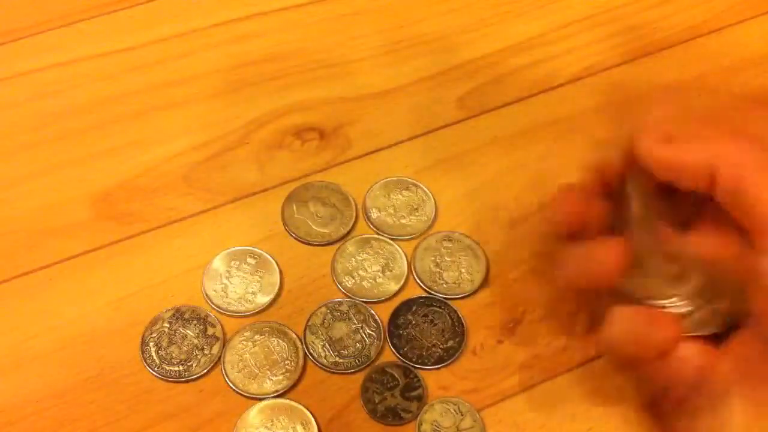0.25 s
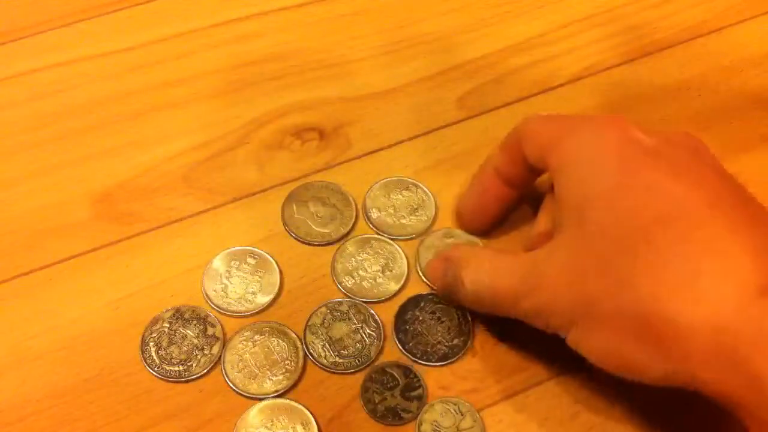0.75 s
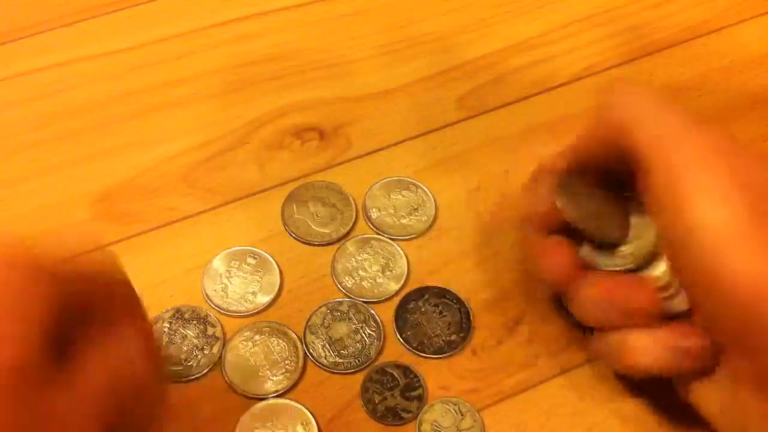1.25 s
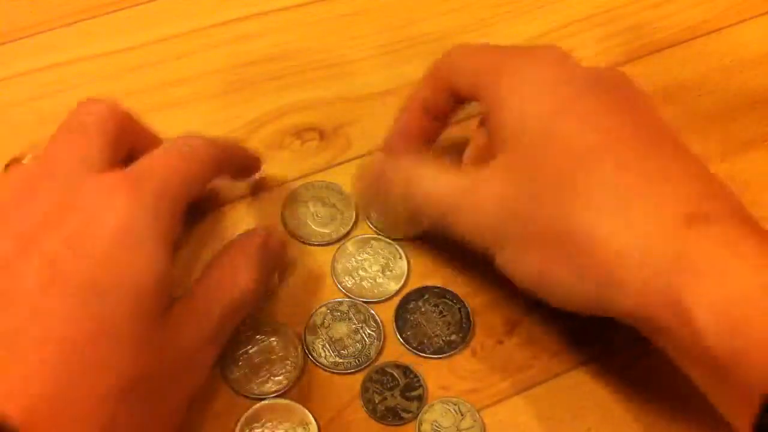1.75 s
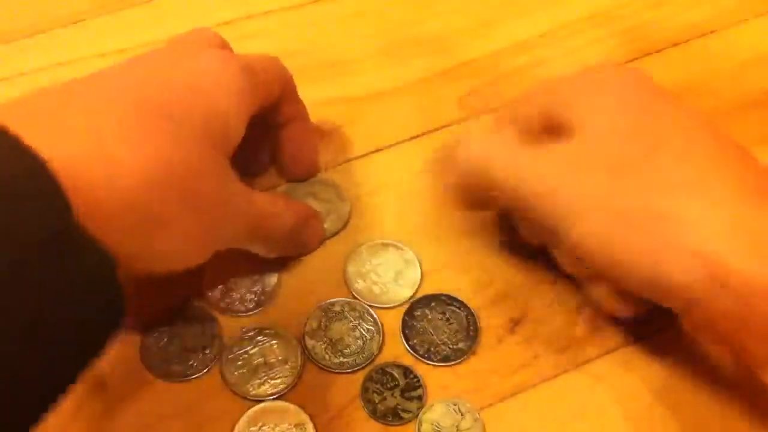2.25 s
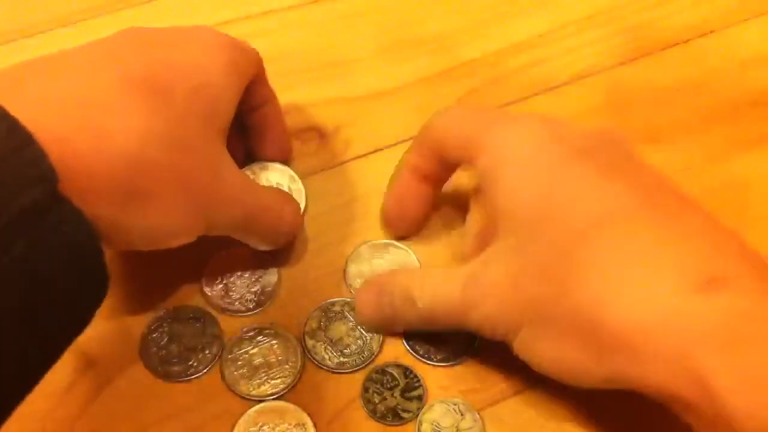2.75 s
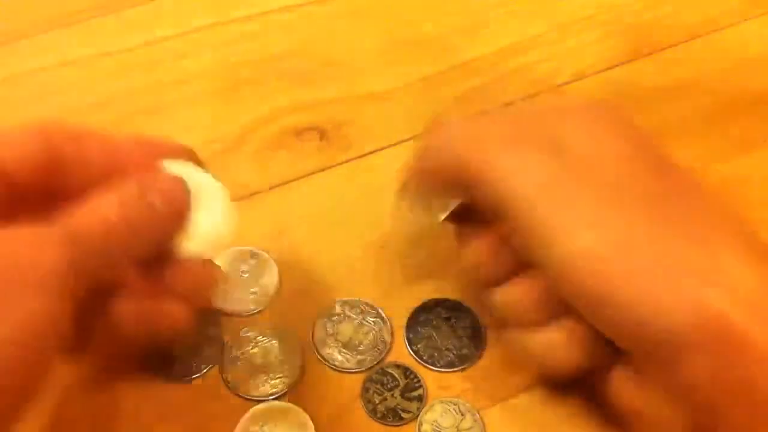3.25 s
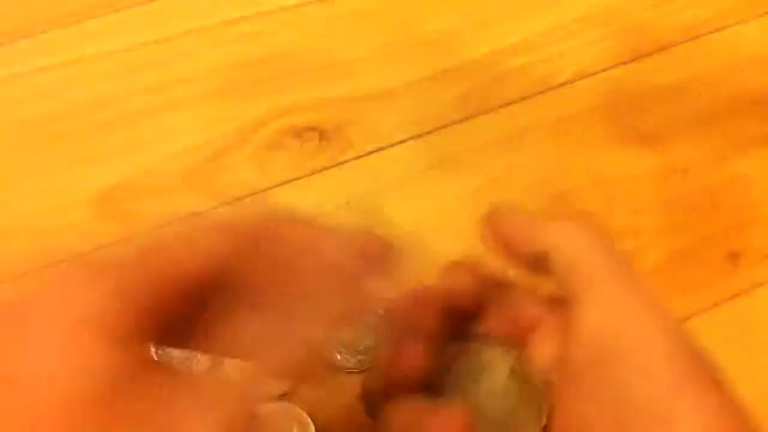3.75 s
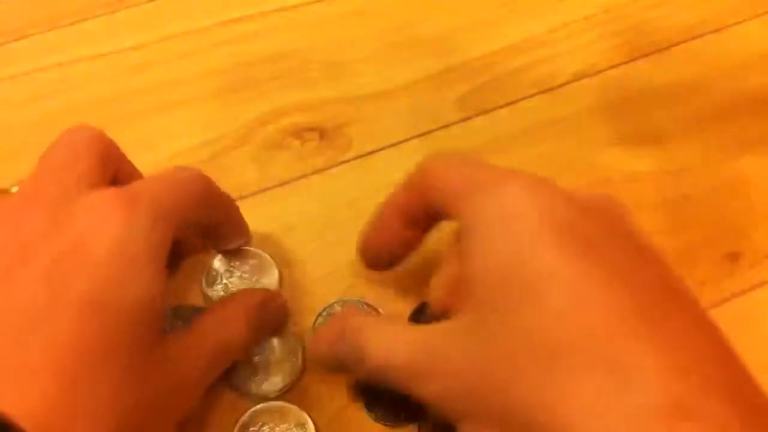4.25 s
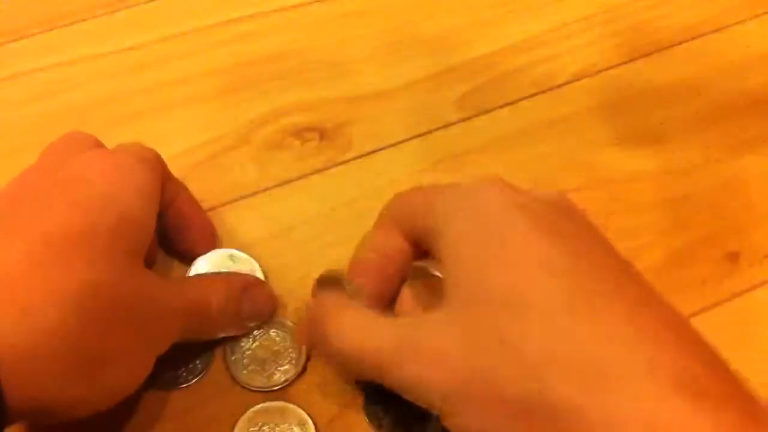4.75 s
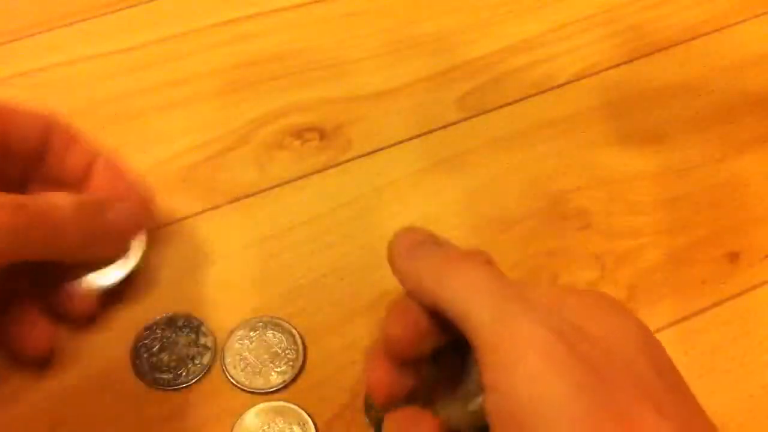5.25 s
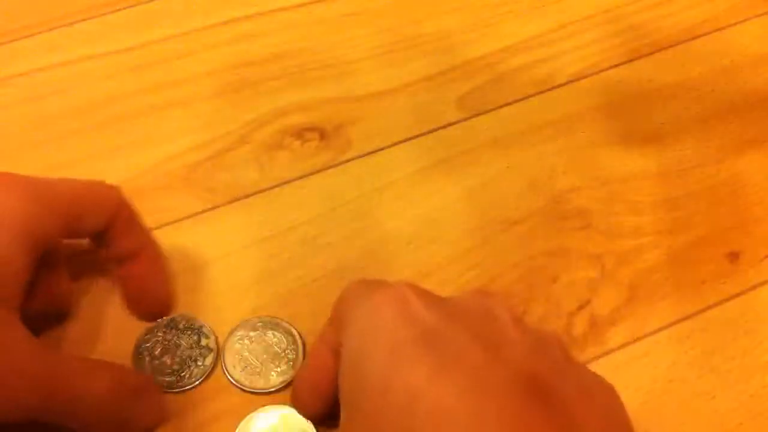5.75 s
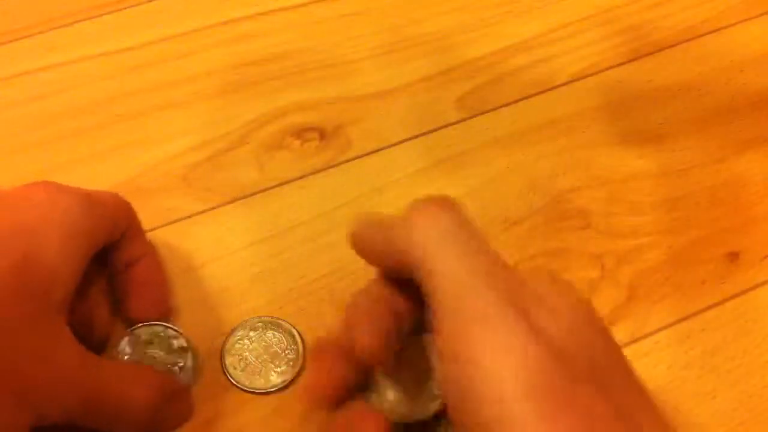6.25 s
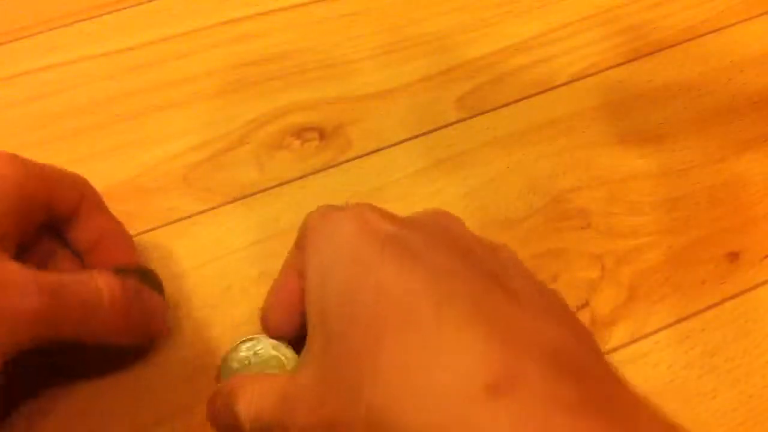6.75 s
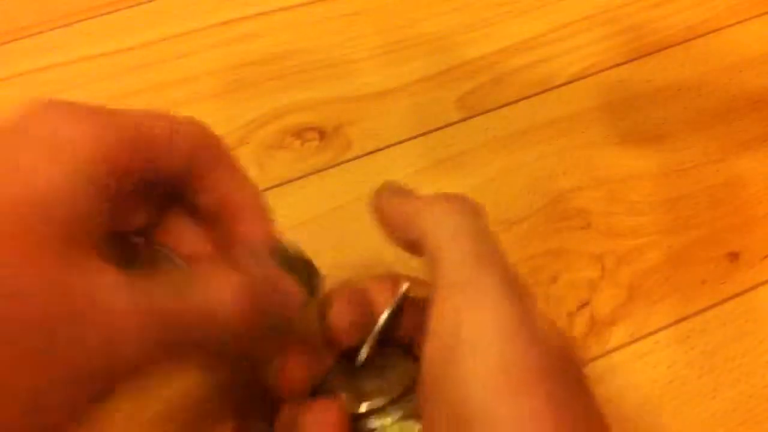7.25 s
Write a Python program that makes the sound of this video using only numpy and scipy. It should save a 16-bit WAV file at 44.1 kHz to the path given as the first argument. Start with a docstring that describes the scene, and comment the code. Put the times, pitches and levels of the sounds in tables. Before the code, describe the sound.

A soft knock on a wooden table opens, followed from about 0.2 to 0.5 seconds by a bright cluster of clinks as coins drop onto others in a palm. Each contact chatters and rings briefly until fingers damp it. Faint taps on the wood follow, then lighter clinks from 1.3 to 1.9 seconds. A knock at 2.2 seconds leads into a run of small clinks and taps until 3 seconds. The busiest, loudest jingling comes between 3.4 and 4.1 seconds. More sharp clinks stand out near 5, 5.3 and 6.3 seconds, with fingertips and coin rims knocking between them. A firmer knock at 6.9 seconds precedes the last few clinks, ending around 7.4 seconds. Everything is close, in a small, slightly echoing room with a faint appliance hum, low rumble and soft hiss.

```python
"""A soft knock on wood, then bright clinks: two hands pick coins off a wooden table and drop them
onto the piles in their palms, close by. Each contact chatters briefly and makes the coins ring until
the fingers damp them. Fingertips and coin rims knock on the table top. A small room echoes, over
an appliance hum, the low murmur of the house and a soft hiss."""
import sys
import numpy as np
from scipy import signal
from scipy.fft import rfft, irfft
from scipy.io import wavfile

SR = 44100
rng = np.random.default_rng(int(sys.argv[2]) if len(sys.argv) > 2 else 0)


def unload_audio(sound):
    """Save the sound as a 16-bit wav file, at the path given as the first command line argument."""
    columns = np.transpose(np.atleast_2d(sound))
    # keep every value between -1 and 1, then stretch to whole-number steps
    steps = np.round(np.clip(columns, -1, 1) * 32767)
    wavfile.write(sys.argv[1], SR, steps.astype(np.int16))


N = 330309

# Coin hits coin: t/s, level/dB, chatter time/s, free ringing time/s, saddle pitch f/Hz,
# then, added to that level: ring from a hit on the face/dB, ring from a hit on the rim/dB, clack/dB
CLINKS = [(0.233, -29.5, 0.011, 0.084, 5860, -19, -9.5, 3.5), (0.258, -23, 0.021, 0.028, 5685, 6, -6, -6),
          (0.2972, -6.5, 0.016, .045, 5600, -4, -12.5, -11), (.324, -32, 0.0092, 0.023, 5890, -7, -13, -12),
          (0.3583, -1, 0.012, 0.034, 5620, -5, 3, -7.5), (0.385, -12, 0.032, 0.036, 5740, 6.5, -7, -13),
          (0.42, -25, 0.05, 0.038, 5710, 7, -13, -9), (0.452, -13.5, 0.011, 0.055, 5770, -17, -19, -8),
          (1.3062, -16.5, 0.018, 0.069, 6050, -10, -6.5, 3.5),
          (1.33, -27.5, 0.036, 0.037, 5500, 3, -12, -0.5),
          (1.398, -22.5, 0.03, 0.032, 5960, -13, -19, -5.5),
          (1.516, -29, 0.0089, 0.036, 5500, -7, -15, 7.5), (1.522, -19, 0.01, 0.031, 5800, -21, -13, 1),
          (1.537, -28.5, 0.0052, .1, 5860, -40, -5.5, 15),
          (1.562, -23, 0.012, 0.066, 5840, -17, -11.5, 7.5), (1.575, -34, .006, .03, 6000, -16, -13, -3),
          (1.856, -20, 0.015, 0.038, 5850, -7, -10, 4.5),
          (1.864, -13.5, 0.02, 0.021, 5520, -18.5, -18, -10.5),
          (2.387, -19.5, .004, 0.015, 5490, 2, 9.5, 3.5), (2.417, -24.5, 0.021, .03, 5750, -16, -11, 4),
          (2.434, -18.5, .017, 0.045, 5660, -25, -8, -6), (2.467, -28, 0.11, 0.084, 5730, -5, -13, -2),
          (2.507, -17, 0.015, 0.031, 5460, -7, -18, -4), (2.525, -22, 0.0097, .03, 5990, -13, -6, -9),
          (2.535, -22, .006, .03, 5700, -12, -16, -12), (2.552, -11.5, 0.025, 0.033, 5400, 1, -8, -15),
          (2.57, -15.5, 0.0036, 0.014, 5630, 1, -19, -3), (2.602, -20, 0.016, 0.018, 5970, -12, -18, 0),
          (2.659, -21, 0.0071, 0.02, 6000, -21, -20.5, -5), (2.724, -26.5, 0.011, .02, 5470, -25, -14, 3.5),
          (2.862, -27.5, 0.0042, 0.016, 5760, 1, -26, 9.5),
          (2.991, -27.5, 0.0068, 0.056, 5630, -22.5, -11.5, 7.5),
          (3.401, -7.5, 0.0054, 0.02, 5470, -4, -3, 3), (3.511, -39, 0.019, 0.03, 5940, -7, -13, -11),
          (3.537, -23, .01, .025, 5900, -17, -16.5, -1.5), (3.547, -14.5, .014, .025, 5900, -9, -15, -14),
          (3.557, -12.5, 0.015, 0.054, 6000, -15.5, -20, -9),
          (3.654, -27.5, .005, 0.017, 6000, -10, -10, -2), (3.683, 2, 0.011, 0.037, 5790, -6.5, -3.5, -14),
          (3.703, -17.5, 0.0037, 0.042, 5700, -0.5, -19, -1),
          (3.804, -4.5, 0.006, 0.035, 5700, -5.5, -9, -1), (3.826, -18, .002, 0.045, 5760, -10, -6, -12),
          (3.848, 0.5, 0.0078, 0.036, 5580, -11, -6, -0.5),
          (3.864, 1.5, 0.0057, 0.051, 5650, -13.5, -10, -0.5),
          (3.871, -0.5, 0.0059, 0.11, 5600, -31, -15, -15), (3.908, -18, 0.012, .03, 5630, -9, -14, -12),
          (3.927, -17, 0.0045, .03, 5660, -9, -9, -13), (3.969, -15.5, 0.0063, 0.025, 5630, -7, 4, -17),
          (3.987, -26, 0.0042, 0.027, 5600, -5, -19, -18), (4.03, -28.5, 0.01, 0.043, 5640, -17, -3, -4),
          (4.098, -27.5, 0.011, 0.021, 5770, -23, -21, -3),
          (4.116, -13.5, 0.0082, 0.017, 5470, -10.5, -34, -7),
          (4.403, -40.5, .016, 0.023, 5780, -24, -12, 8.5),
          (4.494, -37.5, 0.005, .025, 5570, -18, -14, -1.5), (4.834, -39, 0.0066, .022, 5960, -12, -27, -2),
          (4.864, -23, 0.022, 0.028, 5630, 0.5, -23, -4.5), (4.975, -25, 0.0037, 0.011, 5950, -14, -23, 1),
          (4.998, -24, 0.028, .035, 5600, -14, -18, 8), (5.006, -4.5, 0.0056, 0.036, 5620, -7.5, -8.5, -15),
          (5.018, -10.5, 0.019, .03, 5770, -6, -3, -1.5),
          (5.225, -36.5, .006, .025, 5890, -9.5, -14.5, 3.5),
          (5.238, -28, 0.0049, 0.022, 5670, -11, -18, 0.5), (5.252, -37, 0.012, 0.077, 5630, -19, -8.5, 8),
          (5.286, -23.5, 0.0054, .03, 6100, -15, -2, 4), (5.307, -31, 0.0041, 0.089, 5570, -15, -16, 4),
          (5.34, 0.5, 0.007, 0.012, 5760, -1.5, -15, -7), (5.359, -17, 0.0067, 0.031, 6060, -23, -7, -5),
          (6.15, -12.5, 0.013, 0.065, 5660, -13, -22.5, 0.5), (6.202, -32, .005, .03, 5600, -12, -18.5, 5),
          (6.23, -30.5, .006, .03, 5670, -9.5, -20.5, 1), (6.339, -18, .006, 0.022, 5300, -11, -11, -17),
          (6.3428, 2.5, 0.012, 0.039, 5590, -8.5, -20, -14),
          (6.405, -8, 0.0048, 0.012, 5800, -2, -26, -1.5), (6.423, -44, .005, 0.027, 5800, -14, -4, -8),
          (7.058, -9.5, 0.012, 0.014, 5280, -6, -2.5, 0), (7.08, -31, 0.014, 0.022, 5450, -10, -9, 8),
          (7.158, -23.5, .012, .03, 5520, -14, -14, -5), (7.184, -26.5, .007, 0.025, 5990, -19, -19, 6.5),
          (7.219, -31.5, .011, 0.037, 5940, -16.5, -21.5, -18),
          (7.362, -29.5, 0.016, 0.015, 5830, -2, -13, -4)]
# Tone colour (how strong each pitch is) of the coins' bright snap,
# with the highest treble cut away above about 15.6 kHz: f/Hz, level/dB
SNAP_COLOUR = [(1200, -47), (2500, -46), (5600, -8.5), (7000, -6), (8500, -5), (10000, -6), (11400, -10.5),
               (12800, -7.5), (14500, -10), (15600, -16), (15900, -35.5), (17000, -34.5)]
# Tone colour of the pile's dull clack: f/Hz, level/dB
CLACK_COLOUR = [(700, -45.5), (1800, -16), (3000, -6.5), (4200, -3.5), (6500, 0), (12000, -21.5)]

def clinks():
    """A coin lands with a snap and a chatter; the pile clacks in the palm and the metal rings."""
    snap, clack, ring = np.zeros((3, N))
    for s, level_db, chatter_s, free_s, saddle_hz, face_db, rim_db, clack_db in CLINKS:
        ending = 1 + chatter_s / .018  # a tap dies away, a long rattle breaks off
        grit = gain_of(level_db - 15.5) * chatter(chatter_s, spread_db=3.77, rise=0.19, ending=ending)
        grit[24] += gain_of(level_db + 6.5) * np.exp(-chatter_s / 0.015)  # snap, weaker in long rattles
        add(snap, s, grit)
        palm = signal.iirpeak(rng.uniform(3000, 5200), Q=4, fs=SR)  # its hollow changes with each grip
        add(clack, s, gain_of(clack_db) * (0.52 * grit + 0.56 * signal.lfilter(*palm, grit)))
        add(ring, s, gain_of(level_db) * coin_ring(s, chatter_s, free_s, saddle_hz, face_db, rim_db))
    return coloured(snap, SNAP_COLOUR) + coloured(clack, CLACK_COLOUR) + ring


# A coin's tones, in close groups: bending shape (0 saddle, 1 bowl, 2 three-fold), pitch factor
COIN_TONES = [(0, 1), (0, 1.017), (1, .988), (1, 1), (1, 1.022), (2, 1), (2, 1.016)]
# For each of those tones: level/dB, factor on the fade time
TONE_FADES = [(-8, 0.86), (-2, 0.26), (-12.5, 0.35), (5.5, 0.45), (-8, 0.43), (-3.5, 1), (-7.5, 1)]
# New coins come to lie on top and are gripped anew: from t/s, bowl f/Hz, saddle over three-fold/dB
TOP_COINS = [(0, 10030, -2.5), (.28, 10100, -5.5), (.34, 9920, -6.5), (1.0, 10030, -9.5), (1.45, 10040, 9),
             (1.8, 10000, -9.5), (2.0, 9860, 14), (2.545, 9940, -5.5), (2.7, 9930, 6), (3.3, 10000, 13.5),
             (3.5, 9910, -6), (3.815, 10180, -7), (4.05, 9950, -6), (5.1, 9890, 11), (5.9, 9980, 2),
             (6.25, 9860, -7), (7.0, 10220, 6)]

def coin_ring(s, chatter_s, free_s, saddle_hz, face_db, rim_db):
    """A struck coin bends in three shapes at once, each with its own tones, until skin damps it."""
    t = np.arange(SR // 3) / SR
    shape, pitch_factor = np.transpose(COIN_TONES)
    shape = shape.astype(int)
    tone_db, fade_factor = np.transpose(TONE_FADES)[:, :, None]
    _, bowl_hz, saddle_db = [row for row in TOP_COINS if row[0] <= s][-1]
    threefold_hz = 12560 * (saddle_hz / 5456) ** 0.41  # partly follows the saddle pitch
    shape_hz = np.array([saddle_hz, bowl_hz, threefold_hz])
    shape_db = np.array([rim_db + min(saddle_db, 0), face_db, rim_db - max(saddle_db, 0)])
    hz = (pitch_factor * shape_hz[shape])[:, None]
    fade_s = 0.038 + 45 * free_s ** 2  # a coin held loosely for long also rings long
    level_db = tone_db + shape_db[shape, None] - 60 * t / (fade_factor * fade_s)
    # While the coins touch, each bump shoves the waves out of step, least in a freely ringing coin.
    bumps = rng.standard_normal((len(COIN_TONES), len(t) // 50)).repeat(50, 1)
    shove = np.cumsum(bumps * np.exp(-t / (2 * chatter_s)), axis=1) * 0.00059 / max(fade_s, .1)
    tones = gain_of(level_db) * np.sin(2 * np.pi * (hz * t + shove + rng.random(hz.shape)))
    grip_db = -16 / (1 + np.exp(-(t - free_s) / 0.019))  # the fingers close on the coin
    swell = np.minimum(t / (0.51 * chatter_s), 1)
    return gain_of(grip_db) * tones.sum(0) * swell


# Finger or coin rim hits wood: t/s, level/dB, strongest f/Hz, drag time/s, tick over wood tone/dB
KNOCKS = [(0.05, -29, 855, 0.008, -13.5), (0.649, -35, 1590, 0.01, -2), (0.847, -41.5, 1206, 0.0068, -7),
          (.979, -52, 558, 0.0078, 2), (1.128, -29, 1440, 0.01, -10), (2.194, -38, 1180, 0.0056, -4),
          (2.247, -21.5, 1360, 0.012, -24), (2.466, -38.5, 640, 0.025, -10),
          (2.862, -28.5, 1950, 0.0092, -2), (2.948, -28.5, 1600, 0.055, -9.5), (2.99, -24, 1200, 0.01, 1.5),
          (4.335, -41.5, 724, 0.012, -10), (4.766, -23.5, 1278, 0.006, -9), (5.044, -21.5, 1480, .034, -9),
          (5.432, -51, 2500, 0.0056, 9.5), (5.713, -43, 500, 0.0088, -23.5), (5.999, -34, 1186, 0.012, -14),
          (6.524, -24.5, 1130, 0.013, -9.5), (6.618, -35.5, 659, 0.02, -20), (6.745, -45, 1307, 0.052, -33),
          (6.93, -16, 780, 0.011, -14), (6.952, -29.5, 1160, 0.0069, -19), (7.4, -53.5, 720, 0.0096, 17.5)]
# The table top's own tones: f/Hz, level/dB, time to fade by 60 dB/s
WOOD_TONES = [(416.7, -10.5, 0.015), (700, 4, 0.004), (990, 0.5, 0.0073), (1116, -0.5, 0.015),
              (1520, 1, 0.0062), (1900, -1.5, 0.0061), (2450, 2, 0.0018), (3230, -7.5, .0018)]
# Tone colour of the tick of a knock: f/Hz, level/dB
TICK_COLOUR = [(600, -36.5), (1500, -12.5), (3000, -5), (4500, -13), (6000, -20), (9000, -37.5),
               (17000, -35.5)]

def knocks():
    """Each blow ticks and makes the table top ring briefly, most near the blow's strongest pitch."""
    wood, tick = np.zeros((2, N))
    t = np.arange(1024) / SR
    hz, tone_db, fade_s = np.transpose(WOOD_TONES)[:, :, None]
    signs = (-1) ** np.arange(len(hz))[:, None]  # neighbouring tones start in opposite directions
    for s, level_db, strongest_hz, drag_s, tick_db in KNOCKS:
        blow = gain_of(level_db - 4) * chatter(drag_s, spread_db=3.42, rise=0.7, ending=1.5)
        spot_hz = hz * rng.uniform(.93, 1.07, hz.shape)  # each spot is tuned a little differently
        spot_db = tone_db - 4.5 * np.log2(spot_hz / strongest_hz) ** 2
        fades = gain_of(spot_db - 60 * t / fade_s) / np.sqrt(fade_s)
        board = (signs * fades * np.sin(2 * np.pi * spot_hz * t)).sum(0)
        add(wood, s - .004, signal.oaconvolve(blow, board / np.linalg.norm(board)))
        add(tick, s - .004, gain_of(tick_db) * blow)
    bass_cut = signal.butter(3, 380, "high", fs=SR, output="sos")  # a thin board gives off little bass
    return signal.sosfilt(bass_cut, wood) + coloured(tick, TICK_COLOUR)


# How long the room rings: f/Hz, time to fade by 60 dB/s
ROOM_FADES = [(300, 0.17), (1000, 0.36), (3000, 0.43), (6000, 0.44), (10000, 0.35), (16000, 0.068)]

def room(x):
    """The walls send back many small echoes; each pitch dies away at its own speed."""
    echoes = np.zeros(SR // 2)
    slots = np.arange(300, SR // 2 - 20, 20)
    echoes[slots + rng.integers(0, 20, len(slots))] = rng.choice([-1., 1.], len(slots))
    hz, t, bands = signal.stft(echoes, SR, nperseg=256)
    fades = gain_of(-60 * t / value_at(ROOM_FADES, hz)[:, None])
    _, tail = signal.istft(bands * fades, SR, nperseg=256)
    return signal.fftconvolve(x, tail / np.linalg.norm(tail))[:N]


# The pitches in the hum: f/Hz, width/Hz, level/dB
HUM_TONES = [(120.5, 9, 0), (245, 14, -3), (405, 14, -10)]

def appliance_hum():
    """An appliance hums: narrow bands of noise waver around one steady low tone."""
    hz = np.fft.rfftfreq(N, 1 / SR)
    peaks = sum(gain_of(db) / (1 + (2 * (hz - f) / width) ** 2) for f, width, db in HUM_TONES)
    steady = np.sin(2 * np.pi * HUM_TONES[0][0] * np.arange(N) / SR)
    return evened(shaped_noise(peaks) + 0.2 * steady)


# How the background rises and falls: t/s, murmur level/dB, hiss level/dB
BACKGROUND_LEVELS = [(0, -54.5, -63), (.4, -58, -62), (.75, -56.5, -64), (1.56, -57, -59), (2.5, -56, -57),
                     (2.75, -56, -60.5), (3.4, -56.5, -58), (4.2, -57.5, -63), (5.23, -55, -59),
                     (5.53, -62.5, -69), (6.05, -57.5, -66.5), (6.38, -58, -61), (6.6, -55.5, -63.5),
                     (7.49, -57.5, -63)]
# Tone colour of the house's murmur: f/Hz, level/dB
MURMUR_COLOUR = [(12, -40), (20, -34.5), (48, -50), (109, -4.5), (288, -3.5), (325, -10.5), (406, -2.5),
                 (449, -8), (646, -9), (700, -10), (2500, -24), (3250, -75), (5500, -120)]
# Tone colour of a soft hiss, with the highest treble cut away above about 15.6 kHz: f/Hz, level/dB
HISS_COLOUR = [(900, -3.5), (1500, 1), (2000, -10), (3000, -7.5), (10900, -13.5), (15600, -13),
               (15900, -37.5), (17000, -30)]

def background():
    """The house murmurs under a soft hiss; the hum slowly sinks and partly follows the murmur."""
    t, hz = np.arange(N) / SR, np.fft.rfftfreq(N, 1 / SR)
    times, *levels = np.transpose(BACKGROUND_LEVELS)
    murmur_db, hiss_db = (np.interp(t, times, column) for column in levels)
    hum_db = -57 + .3 * (murmur_db - murmur_db.mean()) - 0.78 * t
    hum = gain_of(hum_db) * appliance_hum()
    murmur = gain_of(murmur_db) * shaped_noise(gain_of(value_at(MURMUR_COLOUR, hz)))
    hiss = gain_of(hiss_db) * shaped_noise(gain_of(value_at(HISS_COLOUR, hz)))
    return hum + murmur + hiss


def chatter(length_s, spread_db, rise, ending, size=4096):
    """Tiny uneven bumps swell for the `rise` share of the length; a higher `ending` stops them faster."""
    progress = np.arange(size) / SR / length_s
    lumps = gain_of(spread_db * np.minimum(rng.exponential(1, size // 32), 4)).repeat(32)
    swell = np.exp(-progress ** ending) * np.minimum(progress / rise, 1) ** 2
    grit = rng.standard_normal(size) * lumps * swell
    return grit * np.linalg.norm(swell) / np.linalg.norm(grit)


def coloured(x, colour):
    """Gives a sound a tone colour, with a filter that never rings ahead of the hit."""
    hz = abs(np.fft.fftfreq(2048, 1 / SR))
    log_gain = np.log(gain_of(value_at(colour, hz)))
    response = np.exp(np.conj(signal.hilbert(log_gain)))
    taps = np.fft.ifft(response).real[:1024]
    return signal.oaconvolve(x, taps / np.linalg.norm(taps))[:len(x)]


def shaped_noise(gains):
    """Noise of average strength 1, its pitches weighted by the gains."""
    return evened(irfft(rfft(rng.standard_normal(N)) * gains, N))


def gain_of(db):
    """Turns decibels into a factor to multiply by."""
    return 10 ** (np.asarray(db) / 20)


def evened(x):
    """Scales a sound to an average strength (rms) of 1."""
    return x / np.sqrt(np.mean(x ** 2) + 1e-20)


def value_at(points, hz):
    """Reads between a table's rows, with pitch counted in octaves."""
    f, value = np.transpose(points)
    return np.interp(np.log(hz + 1), np.log(f + 1), value)


def add(mix, s, sound):
    """Mixes a sound in, starting at s seconds."""
    part = mix[round(s * SR):][:len(sound)]
    part += sound[:len(part)]


def scene():
    """Coins and knocks, their echo and the background, in one channel."""
    metal, wood = clinks(), knocks()
    echo = room(gain_of(-14.5) * metal + gain_of(-7.5) * wood)
    return (metal + wood + echo + background())[None]


def record(dry):
    """Rounds off the loudest peaks, then cuts the very highest treble."""
    ceiling, top_hz = .8, 16650
    rounded = dry / (1 + (dry / ceiling) ** 6) ** (1 / 6)
    treble_cut = signal.firwin(511, top_hz, window=("kaiser", 9), fs=SR)
    return signal.oaconvolve(rounded, treble_cut[None], "same")


dry = scene()
out = record(dry)
unload_audio(out)
```